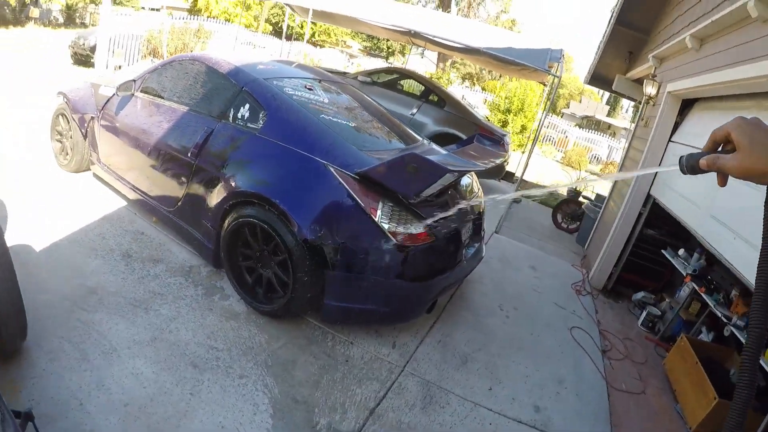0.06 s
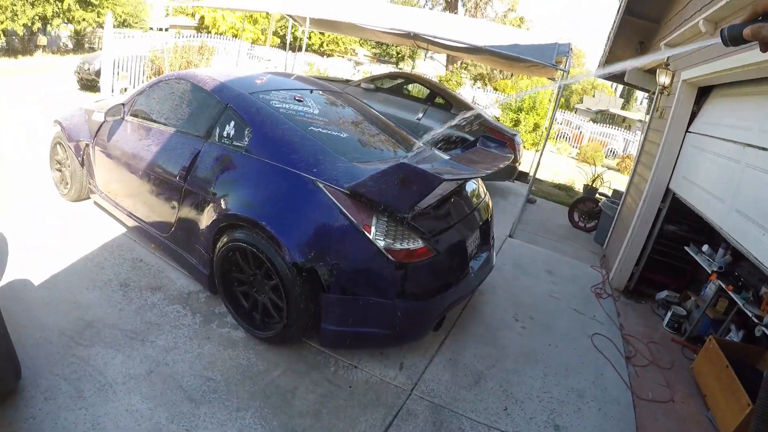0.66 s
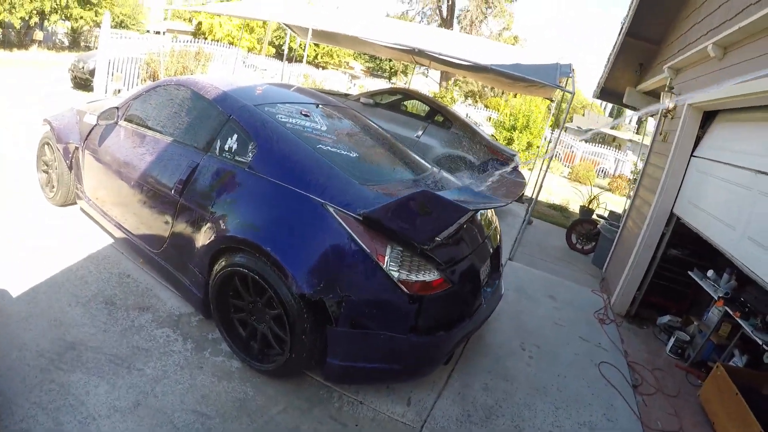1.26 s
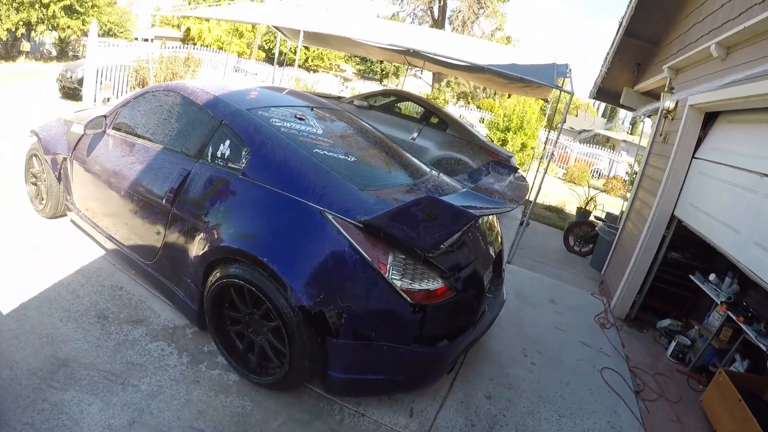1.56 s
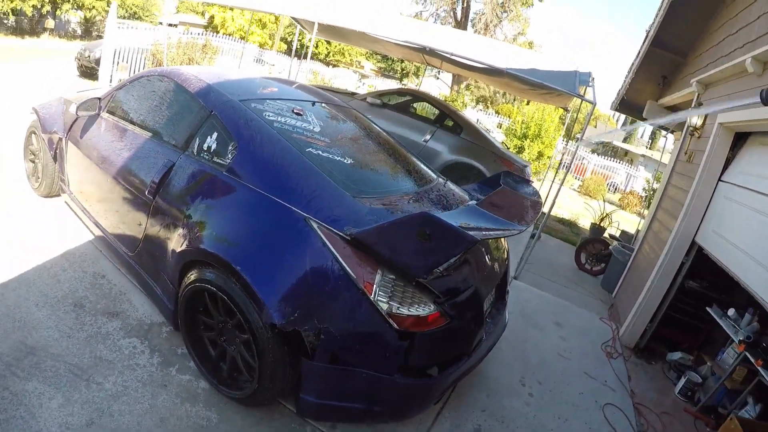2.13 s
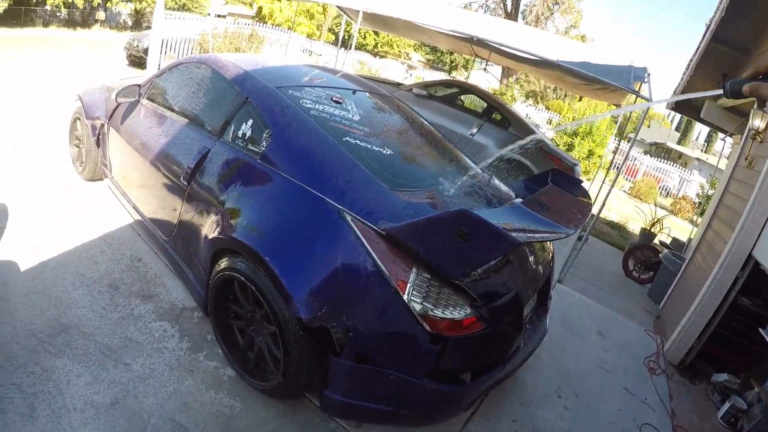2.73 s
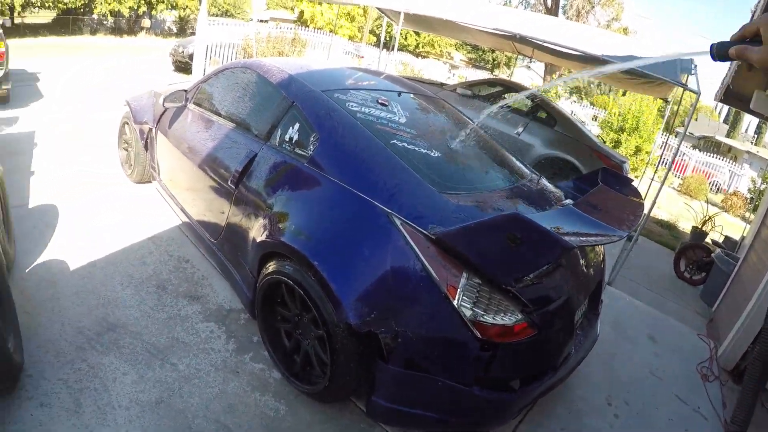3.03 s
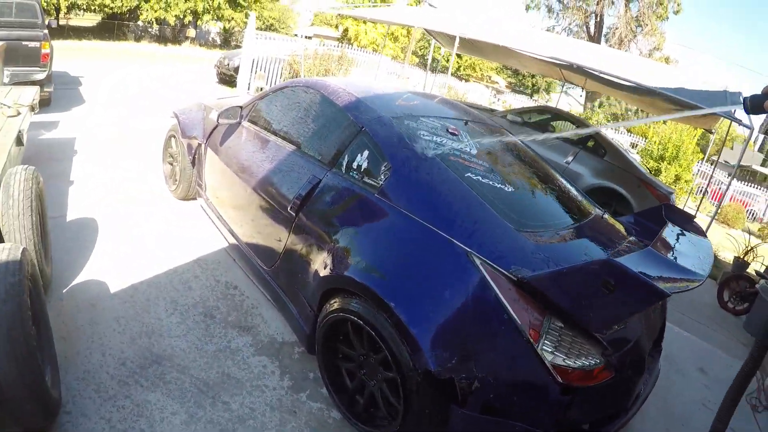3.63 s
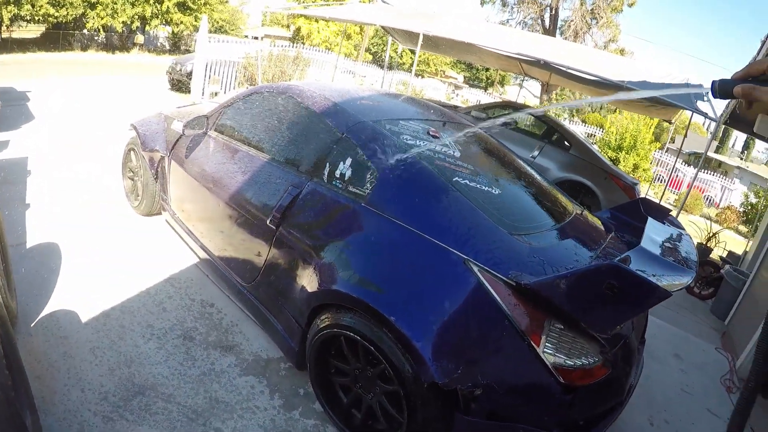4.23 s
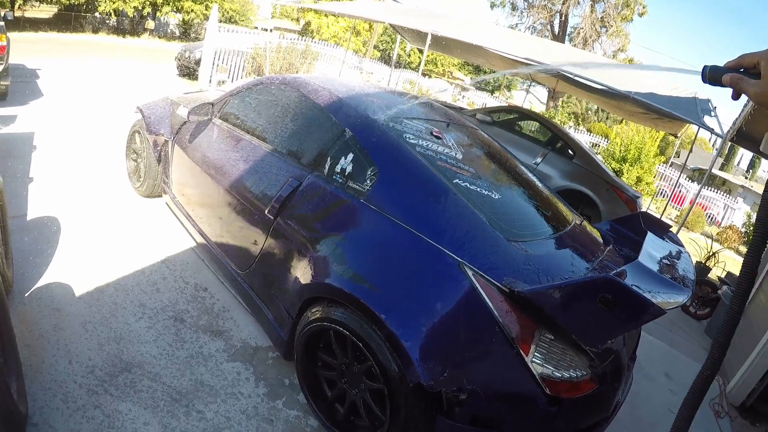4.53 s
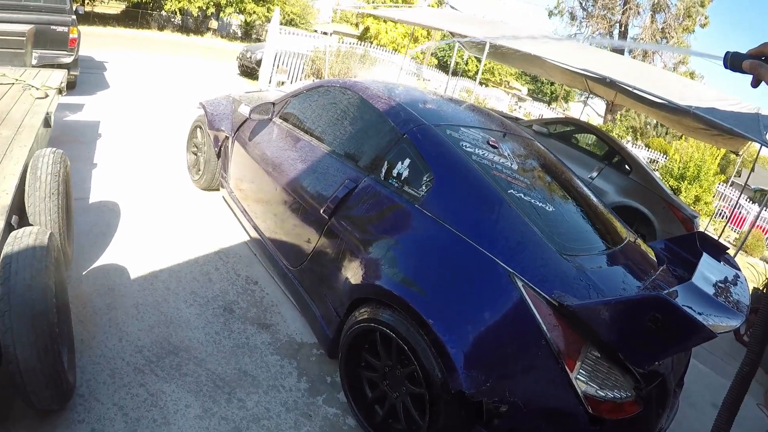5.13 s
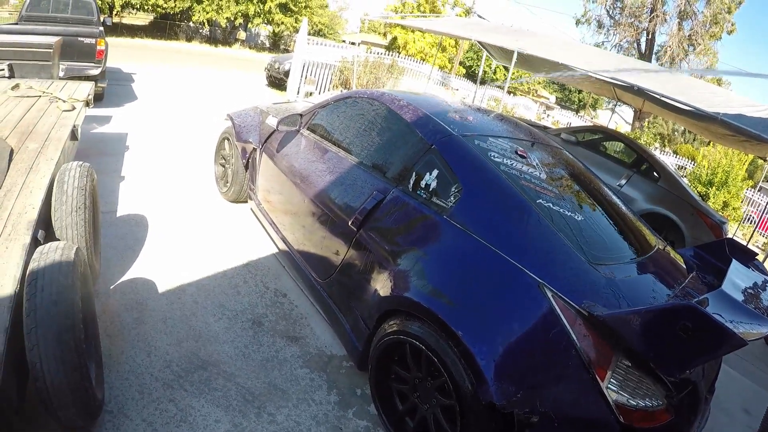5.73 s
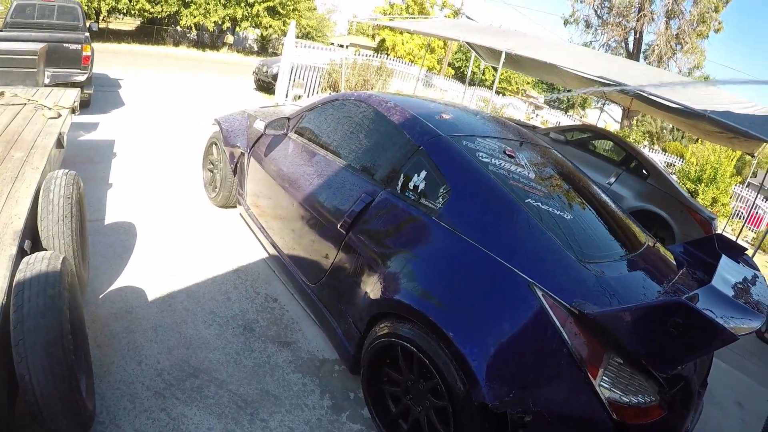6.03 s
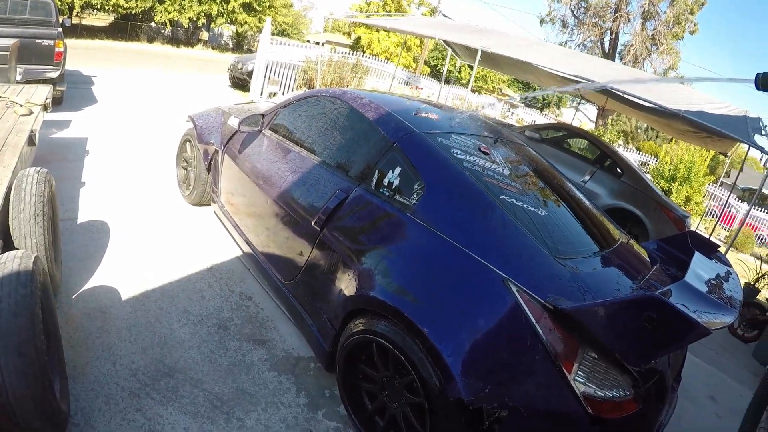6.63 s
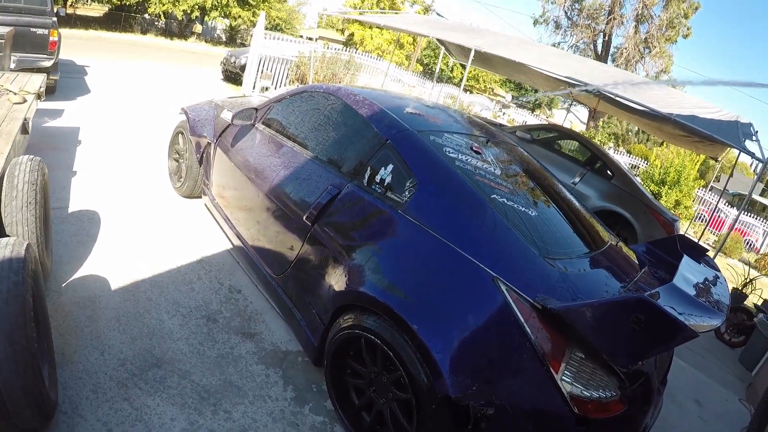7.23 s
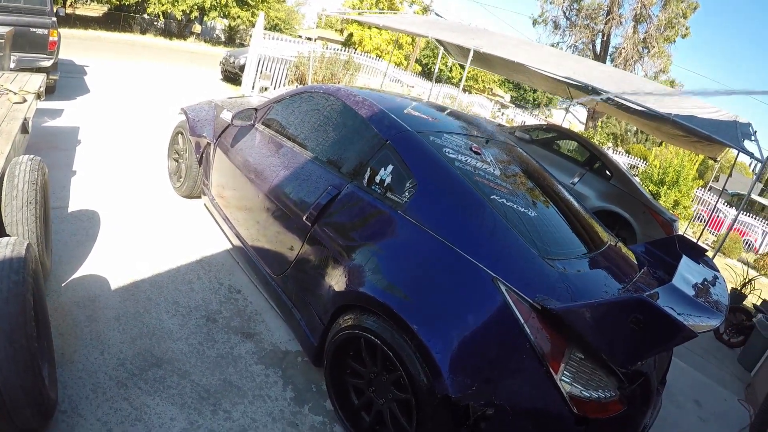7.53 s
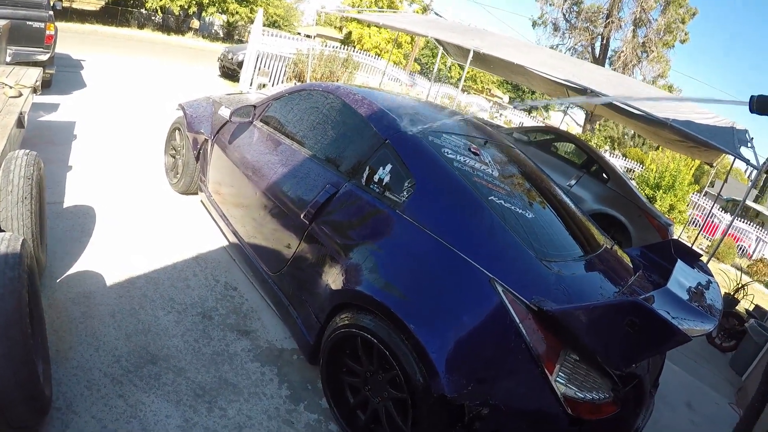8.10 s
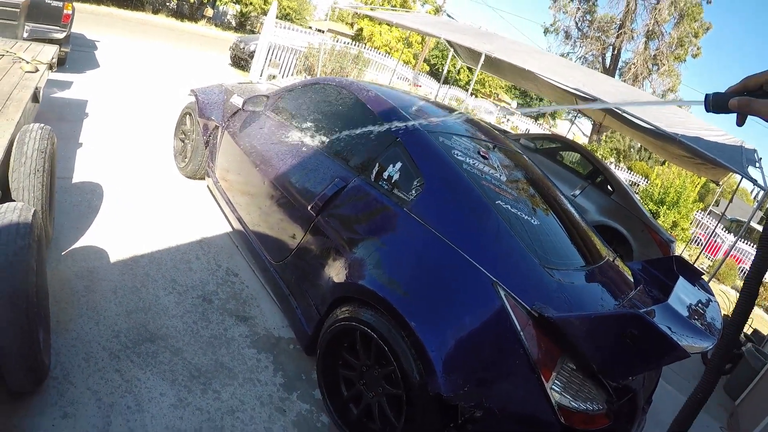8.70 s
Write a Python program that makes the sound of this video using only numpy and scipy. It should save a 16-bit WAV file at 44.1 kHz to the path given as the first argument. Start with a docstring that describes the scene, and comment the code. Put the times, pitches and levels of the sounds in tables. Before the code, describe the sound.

In a driveway, a hose jet drums and splats on the hollow rear of a parked car, then moves over the glass and roof as a lighter, hissing spatter with occasional sharp drops. The spray swells and dips as it sweeps. A low piston motor throbs steadily nearby throughout. The close microphone starts in mono and opens to stereo, with a short echo off the concrete.

```python
"""A hose jet drums and splats on the hollow tail of a parked car while a piston motor thrums nearby.
The water rings the tail lamp, tail panel and spoiler, then spatters over the glass and roof, breaking
into drops, spray and mist that echo off the driveway. Each motor stroke kicks a pipe and puffs out air.
The listener moves from behind the car to its side. The microphone starts in mono and opens to stereo."""
import sys
import numpy as np
from scipy import signal
from scipy.io import wavfile
from scipy.ndimage import map_coordinates

SR = 44100
rng = np.random.default_rng(int(sys.argv[2]) if len(sys.argv) > 2 else 0)


def unload_audio(sound):
    """Save the sound as a 16-bit wav file, at the path given as the first command line argument."""
    columns = np.transpose(np.atleast_2d(sound))
    # keep every value between -1 and 1, then stretch to whole-number steps
    steps = np.round(np.clip(columns, -1, 1) * 32767)
    wavfile.write(sys.argv[1], SR, steps.astype(np.int16))


N = 386316
TIME = np.arange(N) / SR


# water spectra as heard, with the stereo microphone's bright peak near 7 kHz: freq_hz, gain_db
SPLAT_SPECTRUM = [(700, -16), (1050, 4), (1270, 6), (1500, 1.5), (1750, 3), (1970, 4), (2400, 1), (3000, 0),
                  (4500, -23)]
SPATTER_SPECTRUM = [(1500, -18), (2500, -11), (3100, 0.5), (4300, 2), (5300, -3), (6500, -6.5),
                    (8500, -12.5), (11200, -33), (12700, -18.5), (15000, -28.5)]
SPRAY_SPECTRUM = [(4000, -22), (5500, -5.5), (6200, -3), (7300, 3), (8200, -5.5), (9700, -12.5),
                  (11200, -24.5), (12600, -26.5), (15000, -30.5)]
MIST_SPECTRUM = [(7000, -30.5), (10000, -5), (11300, -8), (12100, -1), (12900, -1), (15000, -9.5)]

def jet(slug_db=1.47, gust_db=1.0, spray_trim_db=1.0):
    """The jet breaks into slugs that drum on the panels, splat, and scatter into drops, spray and mist."""
    shares = aim()
    drum_db, splat_db, spatter_db, spray_db, mist_db = water_levels(shares)
    slugs_db = slug_db * wander(70)
    flying_db = slugs_db + gust_db * wander(22)  # rebounding water comes in gusts
    drum = drumming(shares, drum_db + slugs_db)
    slaps = impacts(per_s=1800, spread_db=3, ring_s=0.0084, ring=1, drift_db=2.5)
    splat = placed(slaps, SPLAT_SPECTRUM, splat_db + slugs_db)
    # a hard jet merges the drops into a rush; a grazing jet leaves them apart
    merged = np.clip((splat_db + 55) / 26, 0.1, 0.8)
    drops = pings(per_s=1000, spread_db=5.6, cycles=1, drift_db=2)
    rush = impacts(per_s=6000, spread_db=1, ring_s=0.0019, ring=0.98, drift_db=0)
    water = np.sqrt(1 - merged) * unit_rms(drops) + np.sqrt(merged) * unit_rms(rush)
    spatter = placed(water, SPATTER_SPECTRUM, spatter_db + flying_db)
    droplets = pings(per_s=5400, spread_db=3, cycles=1.2, drift_db=3)
    fine_water = unit_rms(droplets) + 0.51 * np.roll(water, 9, axis=1)
    spray = placed(fine_water, SPRAY_SPECTRUM, spray_db + spray_trim_db + flying_db)
    specks = impacts(per_s=580, spread_db=1.5, ring_s=0.001, ring=0.6, drift_db=-2.5)
    mist = placed(unit_rms(specks) + 0.35 * water, MIST_SPECTRUM, mist_db + flying_db)
    return drum + splat + spatter + spray + mist


# modes of the struck parts: pitch_hz, width_hz, gain_db
TAIL_LAMP = [(450, 76, 1.5), (690, 67, -2), (797, 26, 6.5), (910, 70, 0.5), (1050, 88, 0.5)]
TAIL_PANEL = [(435, 120, 0.5), (580, 35, 1), (630, 32, 2), (765, 84, 2), (924, 100, 0), (1020, 58, 2.5),
              (1250, 72, -1.5)]
SPOILER = [(255, 35, -11), (345, 34, -2), (467, 65, -2.5), (648, 200, -4), (713, 110, -2.5),
           (1016, 220, -9)]
GLASS = [(357, 126, -2), (505, 73, 3.5), (591, 39, 3), (804, 180, -3), (943, 123, -0.5), (1130, 220, -8.5)]
ROOF = [(387, 47, -3.5), (480, 74, -0.5), (720, 470, -8), (968, 236, -5.5)]
# parts hit in turn: arrival_s, sweep_s, modes, drum_db, splat_db, spatter_db, spray_db, mist_db
JET_PATH = [(0.0, .01, TAIL_LAMP, -28.5, -30.5, -33.5, -36, -55),
            (0.191, 0.062, TAIL_PANEL, -31, -36, -38.5, -41, -52.5),
            (0.65, .16, SPOILER, -35.5, -47, -51, -48.5, -54),
            (2.4, .5, GLASS, -45.5, -52, -46, -43, -57.5),
            (3.56, 0.067, GLASS, -37.5, -42, -39, -40.5, -54),
            (4.48, 0.34, ROOF, -47.5, -52.5, -51.5, -47, -59),
            (7.86, 0.25, GLASS, -47.5, -51.5, -44.5, -42.5, -56.5)]
# panel radiation: freq_hz, gain_db
PANEL_SPECTRUM = [(150, -29.5), (300, 4.5), (1200, -3), (1700, -3), (3000, -24)]

def drumming(shares, level_db):
    """Blows of water ring the modes of whichever part is under the jet."""
    blows = impacts(per_s=2500, spread_db=2, ring_s=0.005, ring=0.52, drift_db=3.5)
    drum = np.zeros((2, N))
    for share, (_, _, modes, *_) in zip(shares, JET_PATH):
        panel = np.zeros((2, N))
        for i, (pitch_hz, width_hz, gain_db) in enumerate(modes):
            resonator = signal.iirpeak(pitch_hz, pitch_hz / width_hz, SR)
            panel += (-1) ** i * gain_of(gain_db) * signal.lfilter(*resonator, blows)
        drum += np.sqrt(share) * placed(panel, PANEL_SPECTRUM, level_db)
    return drum


def aim():
    """The share of the jet on each part as it sweeps from one to the next."""
    reached = [np.clip(0.5 + (TIME - arrival_s) / sweep_s, 0, 1)
               for arrival_s, sweep_s, *_ in JET_PATH[1:]]
    return np.maximum(-np.diff([np.ones(N), *reached, np.zeros(N)], axis=0), 0)


# how squarely the jet lands: time_s, force_db
JET_FORCE = [(0, 0.5), (1.25, -3), (1.65, -2.5), (1.95, -5.5), (2.45, -3.5), (2.8, 0.5), (3.3, -3.5),
             (3.6, -1), (3.75, 2), (4.45, -2), (4.8, -2), (5.0, -9.5), (6.5, -5.5), (6.85, 1), (7.3, -1),
             (7.73, -7), (8.05, 1.5), (8.5, -3)]
# jet slips past the car: centre_s, length_s, force_db
JET_SLIPS = [(0.678, 0.065, -13), (2.022, 0.14, -2.5), (2.4, .14, -6), (4.627, 0.045, -2.5),
             (5.24, 0.19, -9), (5.533, 0.033, -5)]
# response to force, in db_per_db: drum, splat, spatter, spray, mist
FORCE_SLOPES = (0.97, 0.96, 0.95, 0.99, 1.4)
# jet catches an edge or hollow: centre_s, length_s, drum_db, splat_db, flying_db
JET_SURGES = [(0.1, .14, 4, 0, -4.5), (0.414, 0.05, -0.5, 13.5, 3.5), (0.766, 0.047, 0, 4, 5.5),
              (0.907, .09, 3.5, 8.5, -0.5), (1.188, 0.12, 7.5, 4.5, 6.5), (1.45, .07, 0.5, -3, 0.5),
              (1.852, 0.11, -1, -1, 3), (2.167, 0.083, 5, 2, 4), (2.269, 0.085, 7, 4.5, 10),
              (2.64, .3, 7, 2, -1), (2.768, .08, -0.5, 1, 3), (3.835, 0.24, 3.5, -0.5, -1),
              (4.148, 0.057, -0.5, 3, 1), (4.34, .12, 3, -1.5, 2), (4.78, .14, 0, 0, 2),
              (5.044, 0.036, 0, -1, 5), (5.425, 0.075, 0, 4, 5.5), (8.078, 0.12, 5.5, 4.5, -1)]

def water_levels(shares):
    """Levels in dB of the five water sounds, set by the part hit, the jet's force and its surges."""
    slips_db = sum(db * swell(centre_s, length_s) for centre_s, length_s, db in JET_SLIPS)
    force_db = curves(JET_FORCE)[0] + slips_db
    parts_db = np.transpose([part[3:] for part in JET_PATH]) @ shares
    levels_db = parts_db + np.outer(FORCE_SLOPES, force_db)
    for centre_s, length_s, drum_db, splat_db, flying_db in JET_SURGES:
        surge = swell(centre_s, length_s)
        levels_db[0] += drum_db * surge
        levels_db[1] += splat_db * surge
        levels_db[2:] += flying_db * surge
    return levels_db


def impacts(per_s, spread_db, ring_s, ring, drift_db, spots=10):
    """Drops of many sizes land on spots, each with its own short ring and drifting share of the jet."""
    t = np.arange(2048) / SR
    pair = np.zeros((2, N))
    for _ in range(spots):
        at, lands, size = landings(per_s / spots, candidates=20000)
        strength = lands * gain_of(spread_db * np.minimum(size, 4.5))
        hits = np.bincount(at, strength * rng.choice([-1, 1], len(at)), N)
        response = rng.standard_normal((2, len(t))) * np.exp(-t / ring_s)
        response *= ring / np.linalg.norm(response, axis=1, keepdims=True)
        response[0, 4] += 1  # contact click, in mid and, a few samples earlier or later, in side
        response[1, rng.integers(0, 9)] += rng.choice([-1, 1])
        pair += convolved(hits * gain_of(drift_db * wander(9)), response)
    return pair


def pings(per_s, spread_db, cycles, drift_db, low_hz=2430, high_hz=14070, pitches=36):
    """Each drop bursts with a few cycles at its own pitch, shifted in phase between mid and side."""
    t = np.arange(512) / SR
    pair = np.zeros((2, N))
    for hz in np.geomspace(low_hz, high_hz, pitches) * rng.uniform(0.98, 1.02, pitches):
        at, lands, size = landings(per_s / pitches, candidates=4000)
        drift = np.interp(at, np.linspace(0, N, 80), rng.standard_normal(80))
        strength = lands * gain_of(spread_db * np.minimum(size, 3.2) + drift_db * drift)
        phase_turns = np.array([[0], [rng.random()]])
        ring = np.sin(2 * np.pi * (hz * t + phase_turns)) * t * np.exp(-t * hz / cycles)
        ring *= np.sqrt(hz) / np.linalg.norm(ring[0])
        pair += convolved(np.bincount(at, strength, N), ring)
    return pair


def landings(per_s, candidates):
    """Random drops: sample index, whether each lands, and size."""
    at = rng.integers(0, N, candidates)
    lands = rng.random(candidates) < per_s * N / SR / candidates
    return at, lands, rng.exponential(1, candidates)


# drop burst as heard: freq_hz, gain_db
CRACK_SPECTRUM = [(1200, -31), (2800, -6.5), (4500, -5), (7400, 4.5), (9500, -16), (11200, -18),
                  (13000, -26), (15000, -29)]
# single drops on the bodywork: start_s, relative_peak_db, pitch_hz
FAT_DROPS = [(1.8342, -33, 4190), (2.267, -28, 5850), (2.7771, -27, 6900), (2.953, -22.5, 7330),
             (3.022, -20.5, 4600), (3.0984, -29, 6340), (4.269, -21, 6700), (4.5521, -23, 7150),
             (5.03, -33, 7240), (5.0656, -37, 7320), (6.2042, -31, 7420), (6.2833, -33.5, 2850),
             (6.8446, -27.5, 2880), (7.0417, -25, 2870), (7.3223, -30, 7250), (7.394, -32, 5740),
             (7.985, -29, 6670), (8.0232, -29, 7420), (8.2282, -30, 7280), (8.2866, -28.5, 7250),
             (8.395, -29, 4650), (8.6973, -27, 7120)]

def fat_drops(trim_db=4, crack_s=0.0011, plink_s=0.0007, splash_s=0.005, splash=0.12):
    """Each fat drop is a sharp crack and a plink at its own pitch, followed by a small splash."""
    t = np.arange(1500) / SR
    envelope = np.exp(-t / crack_s) + splash * np.exp(-t / splash_s)
    crack_taps = colour(signal.unit_impulse(256), CRACK_SPECTRUM)[:256]
    pair = np.zeros((2, N + len(t)))
    for start_s, peak_db, pitch_hz in FAT_DROPS:
        noise = rng.standard_normal((2, len(t))) * envelope
        burst = convolved(crack_taps, noise)[:, :len(t)]
        plink = np.sin(2 * np.pi * pitch_hz * t) * np.exp(-t / plink_s)
        burst += abs(burst).max() * plink
        burst /= abs(burst).max(1, keepdims=True)
        start = round(start_s * SR)
        pair[:, start:start + len(t)] += gain_of(peak_db + trim_db) * burst
    return ears(pair[0, :N], colour(pair[1, :N], SIDE_SPECTRUM))


# motor speed: time_s, turns_per_s
MOTOR_SPEED = [(0.0, 16.133), (1.19, 16.02), (1.59, 15.937), (2.39, 15.992), (3.58, 15.812), (3.98, 15.988),
               (4.78, 15.835), (5.57, 16.082), (6.37, 16.051), (7.17, 15.91), (7.96, 15.995),
               (8.36, 16.219), (8.76, 15.731)]
# hum behind and beside the car: harmonic, relative_db
HUM_BEHIND = [(1, -34.5), (2, -25.5), (3, -6), (4, -21.5), (5, -11.5), (6, 3), (7, -15.5), (8, -33),
              (9, -26.5), (10, -10), (11, -20.5), (12, -33), (13, -36), (14, -43), (15, -37), (16, -34)]
HUM_BESIDE = [(1, -18.5), (2, -15), (3, -8), (4, -8.5), (5, -3), (6, 0.5), (7, -14), (8, -12), (9, -20),
              (10, -17.5), (11, -49.5), (12, -28), (13, -34), (14, -33), (15, -31.5), (16, -37.5)]
# pipe resonances: pitch_hz, width_hz
PIPE_MODES = [(88, 5), (66, 16)]
# hum balance: freq_hz, left_minus_right_db
HUM_BALANCE = [(30, 0), (60, -2), (96, -5), (130, -4.5), (160, -11.5), (250, -21)]
# motor noise spectra: freq_hz, gain_db
PUFF_SPECTRUM = [(100, -23.5), (170, 6.5), (250, -0.5), (310, -8.5), (400, -6.5), (550, -20.5), (800, -21),
                 (2000, -49)]
RUMBLE_SPECTRUM = [(8, -38.5), (25, 5), (45, 4), (70, -1.5), (92, 1.5), (120, -2.5), (160, -7),
                   (230, -18.5), (400, -54.5), (4000, -75)]
# listening: time_s, hum_db, listener_place (0 behind, 1 beside), microphone_stereo_width (0 to 1)
LISTENING = [(0, -12.5, 0.14, 0), (1.4, -12, 0.41, 0), (2.2, -12, 0.55, 0.93), (3, -12.5, 0.52, 0.9),
             (4, -12.5, 0.98, 1), (8.76, -13, 1, 1)]

def motor(kick_turn=0.199, slap_turn=0.02, puff_turn=0.042, uneven_db=0.04, rumble_db=-26,
          puff_db=-41, puff_sharpness=5.3, puff_floor=0.39):
    """One stroke a turn kicks the pipe into a throbbing hum; a valve slaps and lets out a puff of air."""
    turns = np.cumsum(curves(MOTOR_SPEED)[0]) / SR
    hum_db, place, _ = curves(LISTENING)
    harmonics, behind_db = np.transpose(HUM_BEHIND)
    beside_db = np.transpose(HUM_BESIDE)[1]
    hz = harmonics * np.mean(np.transpose(MOTOR_SPEED)[1])
    pipe_lag = sum(np.angle(pitch_hz ** 2 - hz ** 2 + 1j * width_hz * hz)
                   for pitch_hz, width_hz in PIPE_MODES)
    pipe_phase = 2 * np.pi * harmonics * kick_turn - pipe_lag
    valve_phase = np.pi / 2 - 2 * np.pi * harmonics * slap_turn
    phase = np.where(harmonics <= 10, pipe_phase, valve_phase)
    behind, beside = (gain_of(db) / np.linalg.norm(gain_of(db)) for db in (behind_db, beside_db))
    left_over_right = gain_of(value_at(HUM_BALANCE, hz))
    side_share = (left_over_right - 1) / (left_over_right + 1)
    mid, side = np.zeros((2, N))
    for i, harmonic in enumerate(harmonics):
        amplitude = behind[i] + place * (beside[i] - behind[i])
        partial = amplitude * np.cos(2 * np.pi * harmonic * turns + phase[i])
        mid += partial
        side += side_share[i] * partial
    strength = np.sqrt(2) * gain_of(hum_db + uneven_db * wander(15))
    gate = puff_floor + np.exp(puff_sharpness * (np.cos(2 * np.pi * (turns - puff_turn)) - 1))
    puff = gain_of(puff_db) * unit_rms(gate * colour(rng.standard_normal(N), PUFF_SPECTRUM))
    rumble = gain_of(rumble_db) * unit_rms(colour(rng.standard_normal(N), RUMBLE_SPECTRUM, size=16384))
    return ears(strength * mid + puff + rumble, strength * side - 0.46 * puff - 0.15 * rumble)


def driveway(pair, wet_db=-9.5, decay_s=0.022, delay_s=0.004, density=0.04):
    """The concrete and the garage front scatter a short echo."""
    t = np.arange(8192) / SR
    reflections = rng.standard_normal((2, len(t))) * (rng.random((2, len(t))) < density)
    taps = reflections * np.exp(-t / decay_s) * (t > delay_s)
    mid, side = convolved(pair.mean(0), taps / np.linalg.norm(taps, axis=1, keepdims=True))
    return pair + gain_of(wet_db) * ears(mid, 0.3 * side)


# quiet outdoors as heard: freq_hz, gain_db
YARD_SPECTRUM = [(200, 0.5), (350, -0.5), (650, -6), (1000, -7), (1400, -9.5), (2000, -16), (3200, -13),
                 (5000, -22.5), (7200, -22), (11000, -35.5), (15000, -46)]

def yard(level_db=-49.5):
    """A soft, even outdoor wash."""
    return placed(rng.standard_normal((2, N)), YARD_SPECTRUM, level_db)


# water balance: freq_hz, left_minus_right_db
WATER_BALANCE = [(300, -2.5), (1100, -6.5), (1800, 3.5), (2700, -2.5), (4100, 0), (6300, 3.5), (9000, -2),
                 (15000, -1.5)]

def leaning(pair):
    """Each band of the water sits a little left or right once the stereo width opens."""
    width = curves(LISTENING)[2]
    tilted = np.array([colour(ear, [(hz, sign * db / 2) for hz, db in WATER_BALANCE])
                       for ear, sign in zip(pair, (1, -1))])
    return pair + width * (tilted - pair)


# microphone's stereo spread: freq_hz, side_minus_mid_db
SIDE_SPECTRUM = [(300, -1), (900, -2.5), (1300, 0.5), (2000, -4.5), (3000, -5.5), (3800, -27.5),
                 (4400, -13), (5000, -1), (6200, -6.5), (7500, -0.5), (10000, 7), (11300, 2.5),
                 (12500, -8.5), (15000, -0.5)]

def placed(pair, spectrum, level_db):
    """Colours a mid and side pair, sets its level and spreads it over the two ears."""
    mid = colour(pair[0], spectrum)
    side = colour(colour(pair[1], spectrum), SIDE_SPECTRUM)
    return gain_of(level_db) / np.std(mid) * ears(mid, side)


def ears(mid, side):
    """Left and right, as far as the stereo width has opened."""
    width = curves(LISTENING)[2]
    return np.array([mid + width * side, mid - width * side])


def colour(x, spectrum, size=4096):
    """Minimum-phase filter: clicks stay sharp in front and ring behind."""
    hz = abs(np.fft.fftfreq(size, 1 / SR))
    log_gain = np.log(gain_of(value_at(spectrum, hz)))
    taps = np.fft.ifft(np.exp(np.conj(signal.hilbert(log_gain)))).real
    return signal.oaconvolve(x, taps[:size // 2])[:N]


def convolved(x, responses):
    """One signal through a pair of impulse responses."""
    return signal.oaconvolve(x[None], responses, axes=1)[:, :N]


def wander(per_s):
    """Random drift of unit rms that changes about per_s times a second."""
    knots = rng.standard_normal(4000)
    drift = map_coordinates(knots, [TIME[::32] * per_s], order=1, mode="wrap")
    return unit_rms(drift).repeat(32)[:N]


def swell(centre_s, length_s):
    """A smooth rise and fall around one moment."""
    return np.exp(-(2 * (TIME - centre_s) / length_s) ** 2)


def curves(rows):
    """Each column of a time table at every sample."""
    time_s, *columns = np.transpose(rows)
    return [np.interp(TIME, time_s, column) for column in columns]


def value_at(spectrum, hz):
    """A spectrum's dB value, interpolated over log frequency."""
    freq_hz, gain_db = np.transpose(spectrum)
    return np.interp(np.log(hz + 1), np.log(freq_hz + 1), gain_db)


def gain_of(db):
    """Decibels to amplitude."""
    return 10 ** (np.asarray(db) / 20)


def unit_rms(x):
    """Scales to unit rms."""
    return x / np.sqrt(np.mean(x ** 2) + 1e-20)


def scene():
    """Water on the car, the motor and the yard."""
    water = leaning(jet() + fat_drops())
    return driveway(water) + motor() + yard()


# microphone colour in mono: freq_hz, gain_db
MONO_SPECTRUM = [(3000, 0.5), (4500, 6), (5700, 3.5), (6400, 1), (7300, -8), (8500, 2), (11200, -5),
                 (12600, 2.5), (15000, 3.5)]

def record(dry, cutoff_hz=15250):
    """The microphone changes colour as it opens from mono to stereo; a low-pass limits the band."""
    width = curves(LISTENING)[2]
    coloured = np.array([colour(ear, MONO_SPECTRUM) for ear in dry])
    heard = width * dry + (1 - width) * coloured
    low_pass = signal.firwin(511, cutoff_hz, window=("kaiser", 9), fs=SR)
    return signal.oaconvolve(heard, low_pass[None], "same")


dry = scene()
out = record(dry)
unload_audio(out)
```